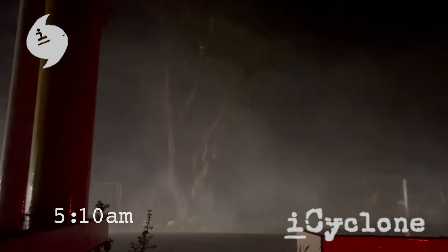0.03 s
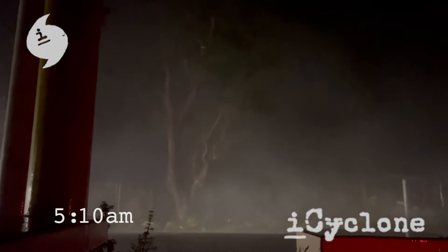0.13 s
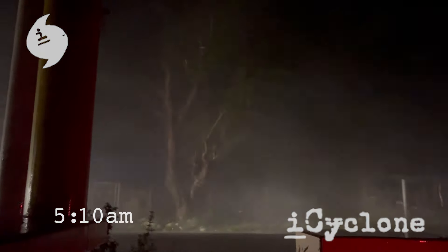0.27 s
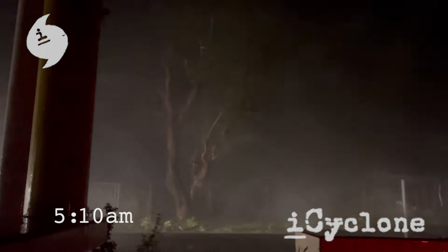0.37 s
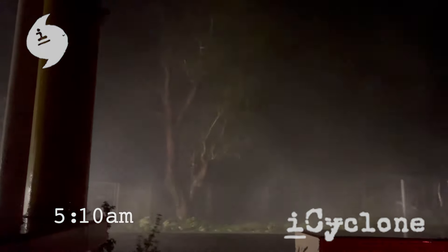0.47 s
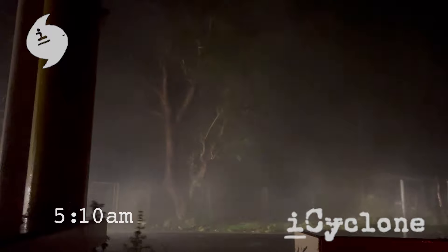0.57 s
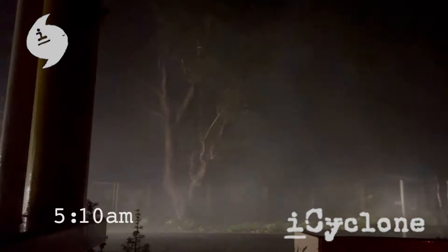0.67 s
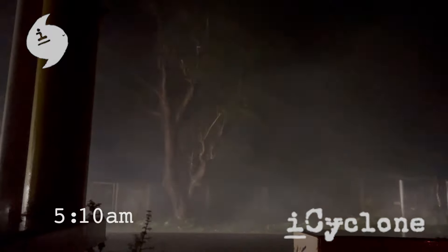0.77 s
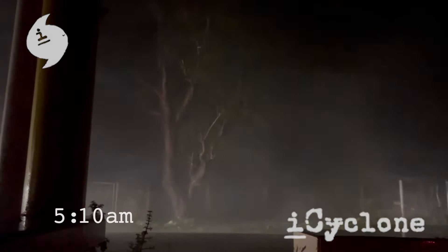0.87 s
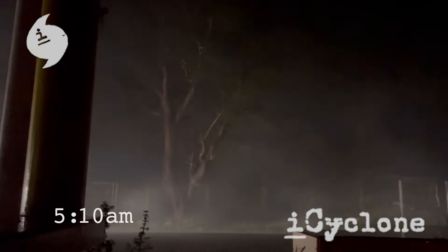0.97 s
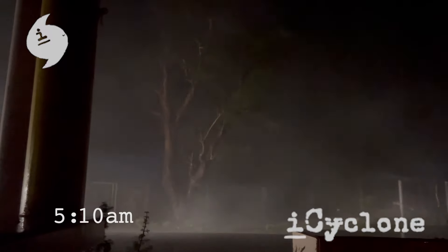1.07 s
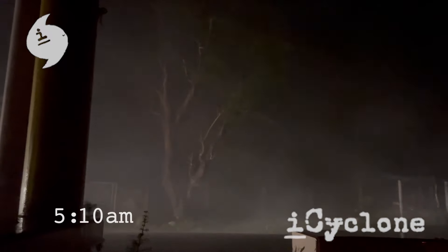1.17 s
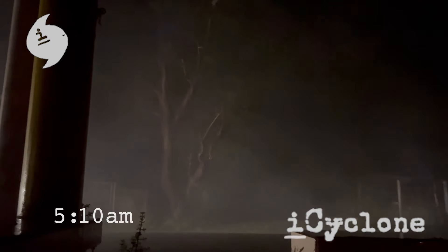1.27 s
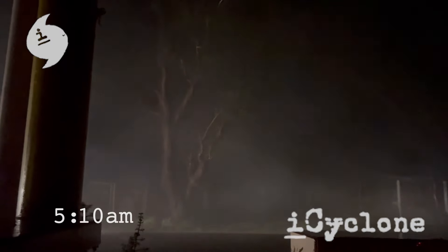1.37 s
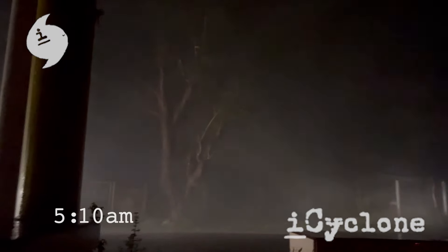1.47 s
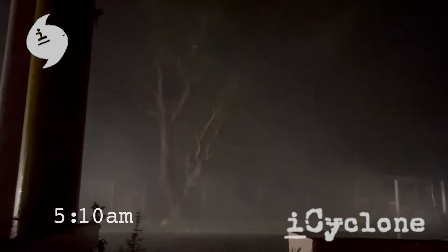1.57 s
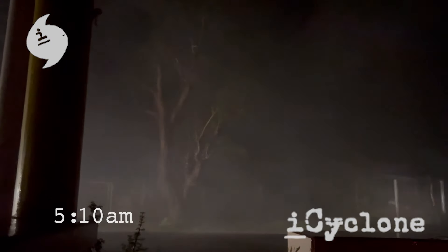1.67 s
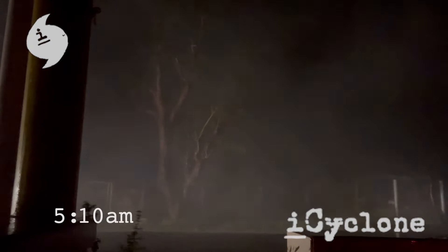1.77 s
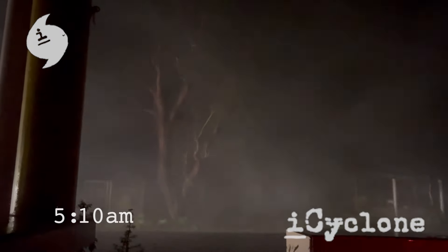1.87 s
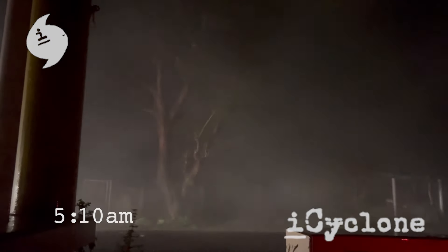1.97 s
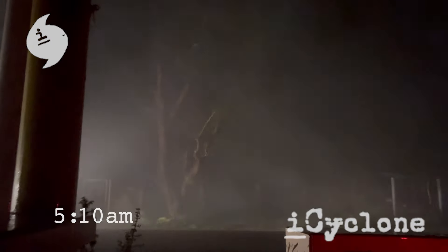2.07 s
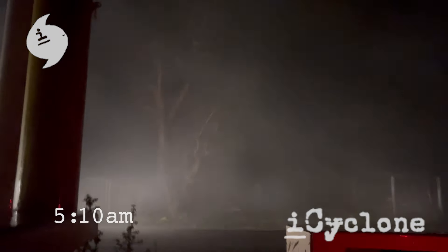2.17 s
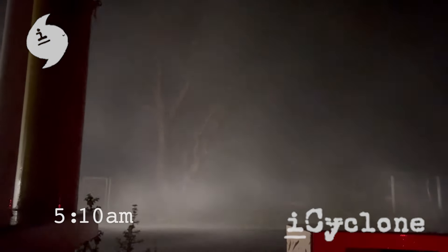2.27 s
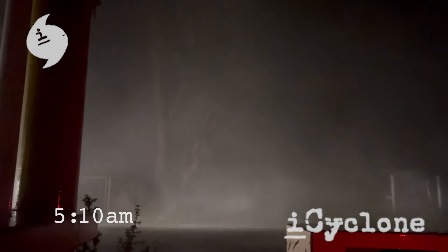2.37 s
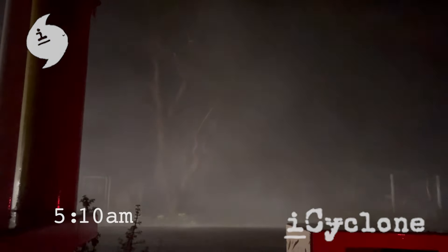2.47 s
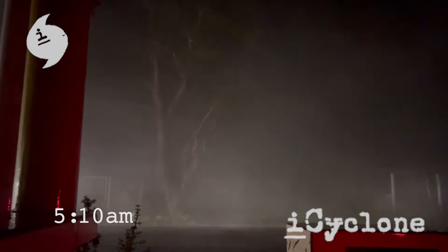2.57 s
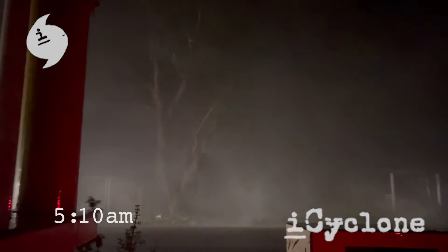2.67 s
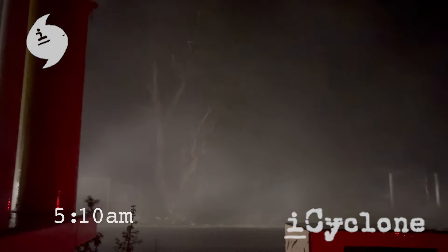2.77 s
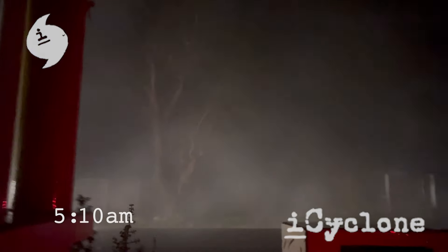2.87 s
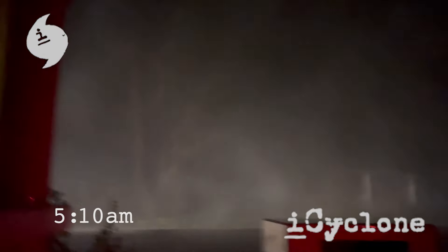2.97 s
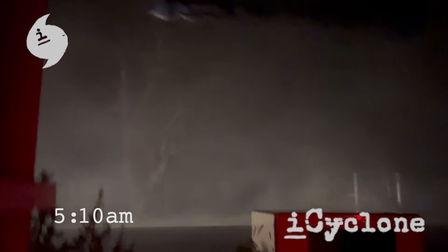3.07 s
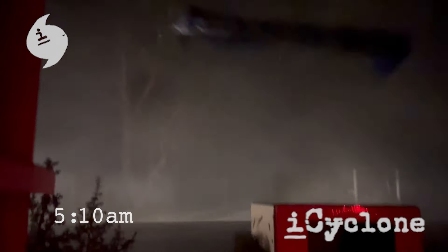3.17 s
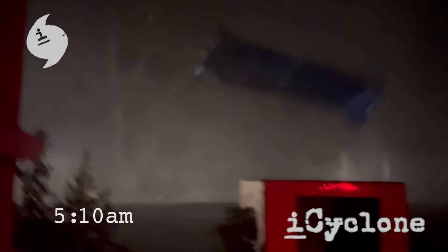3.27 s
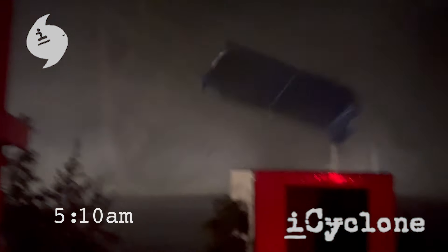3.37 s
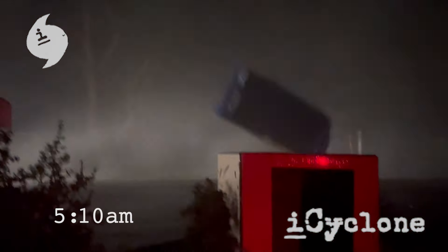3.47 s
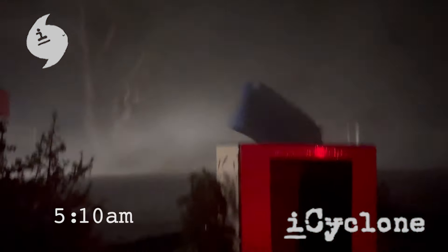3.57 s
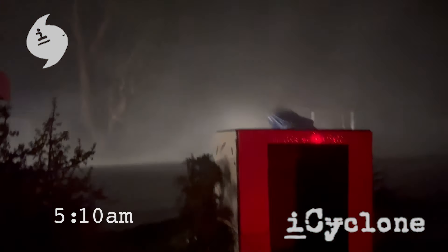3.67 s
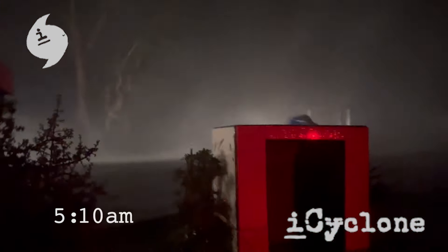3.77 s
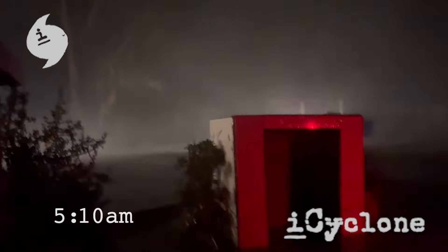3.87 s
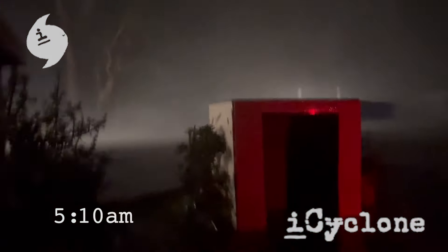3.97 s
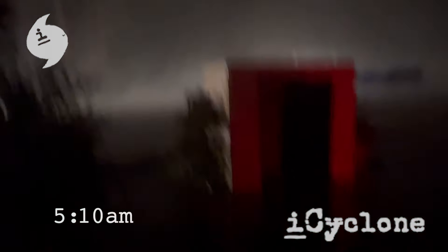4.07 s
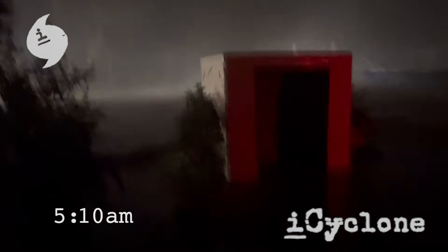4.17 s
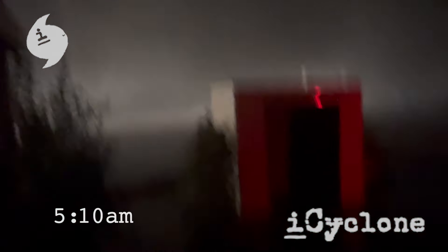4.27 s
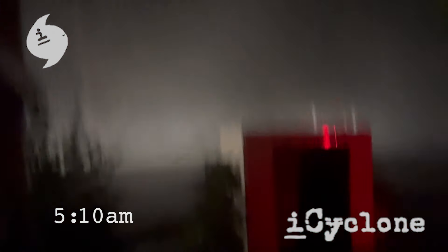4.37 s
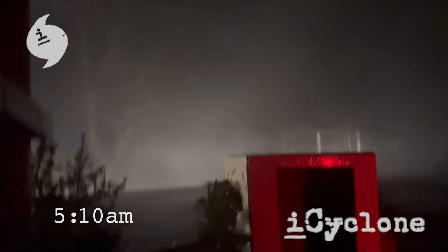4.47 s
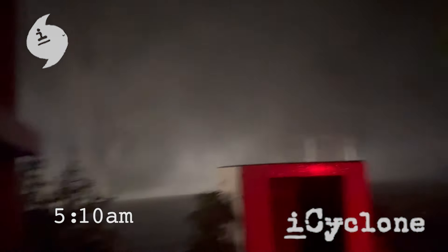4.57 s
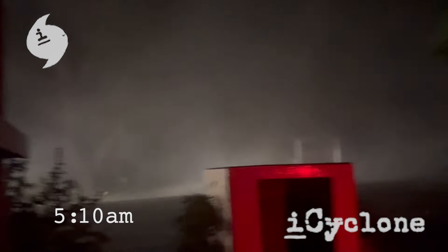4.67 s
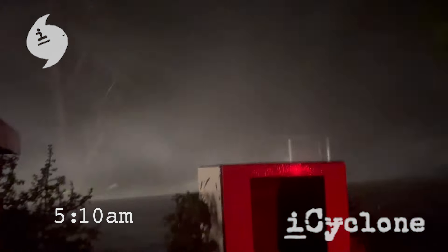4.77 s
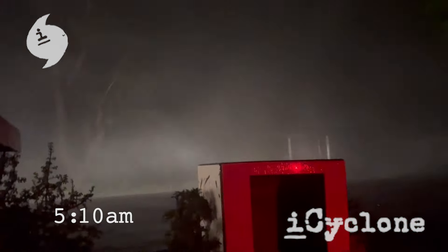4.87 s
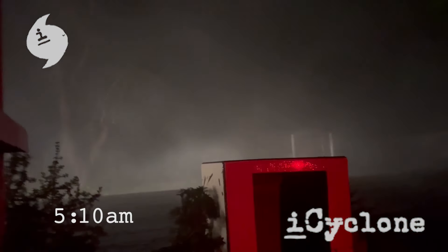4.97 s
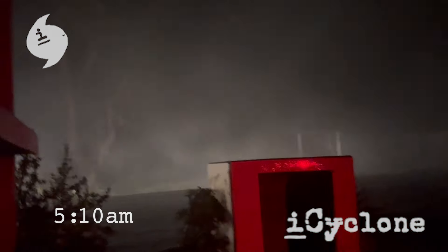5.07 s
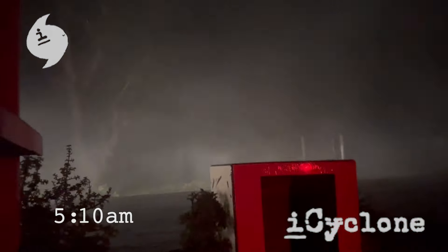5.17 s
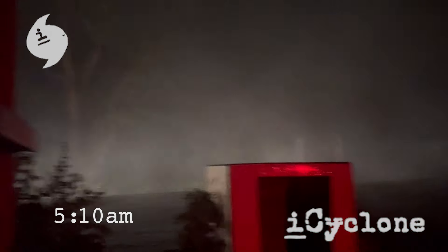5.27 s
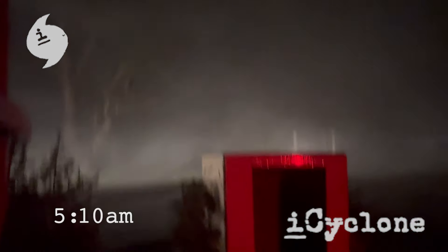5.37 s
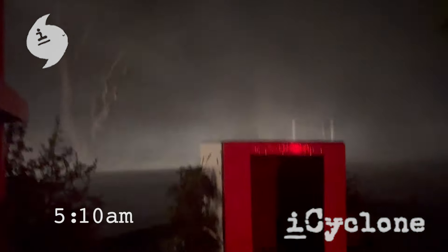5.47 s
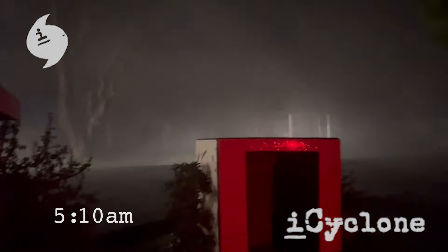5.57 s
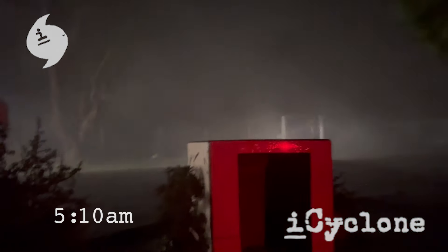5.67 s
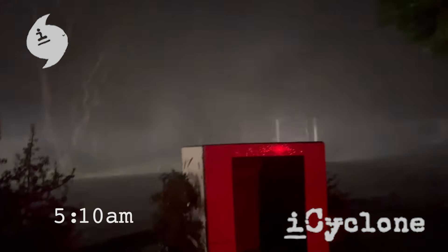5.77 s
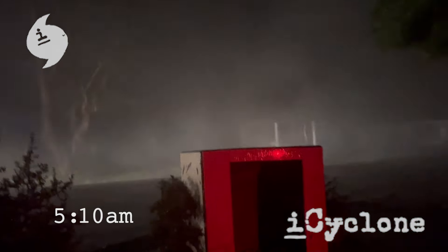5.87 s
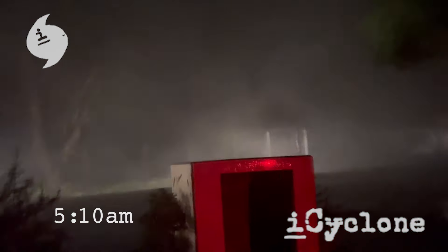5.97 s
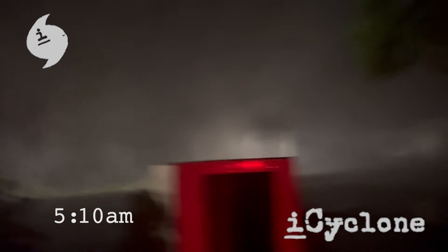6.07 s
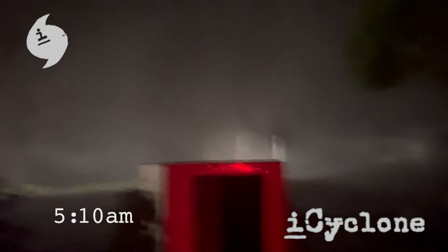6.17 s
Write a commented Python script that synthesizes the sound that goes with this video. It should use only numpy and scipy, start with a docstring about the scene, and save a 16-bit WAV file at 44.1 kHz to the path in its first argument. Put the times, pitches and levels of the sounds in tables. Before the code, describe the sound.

Fierce night storm heard from a porch: gusting wind, spray, heaving metal thumps near two seconds, a sharp crack and panel crash later.

```python
"""Hurricane wind roars round a building and rushes through trees: turbulent noise with fluctuating bands.
Low swells and noise drive the damped air modes of a porch; spray and drops add a hissing, pattering rain.
Loose sheet metal heaves and a flying panel crashes and bounces: dense contacts that excite plate modes.
Grit strikes ring wall boards briefly, and wind at edges sings as short wavering tones.
A phone sheltering in the porch hears it all through two microphone ports."""
import sys
import numpy as np
from scipy import signal
from scipy.fft import rfft, irfft
from scipy.io import wavfile
from scipy.ndimage import uniform_filter1d

SR = 44100
rng = np.random.default_rng(int(sys.argv[2]) if len(sys.argv) > 2 else 0)


def unload_wav(signal):
    """Save mono or channel-first audio to the path in sys.argv[1] as 16-bit WAV at rate SR, clipped to [-1, 1]."""
    wavfile.write(
        sys.argv[1],
        SR,
        np.round(np.clip(np.atleast_2d(signal).T, -1, 1) * 32767).astype(np.int16),
    )


N = 275184
# time in s, and the frequency in Hz of each Fourier bin
T, F = np.arange(N) / SR, np.arange(N // 2 + 1) * SR / N


def undb(db):
    """Amplitude ratio: 20 dB is a factor of ten."""
    return np.exp(np.asarray(db) * (np.log(10) / 20))


def unit(x):
    """Power normalisation: scale to an rms of 1."""
    return x / np.sqrt(np.mean(x ** 2))


def curves(table):
    """Linear interpolation of each control column at every sample."""
    times, *columns = np.transpose(table)
    return [np.interp(T, times, column) for column in columns]


def response(points):
    """Magnitude response: decibels interpolated over log frequency."""
    hz, db = np.transpose(points)
    return undb(np.interp(np.log(F + 1), np.log(hz), db))


def shape(x, gain):
    """Linear filtering: multiply the spectrum by a gain for every frequency."""
    return irfft(rfft(x) * gain, N)


def resonance(hz, width):
    """Damped oscillator: the response of one mode, 1 at its centre."""
    return 1j * F * width / (hz ** 2 - F ** 2 + 1j * F * width)


def noise():
    """Diffuse field: unrelated white noises for mid and side."""
    return rng.standard_normal((2, N))


def walk(rate):
    """Slow random fluctuation: levels held for 1 / rate s and smoothed twice, rms 1."""
    hold = max(int(SR / rate), 2)
    held = np.repeat(rng.standard_normal(N // hold + 2), hold)
    smooth = uniform_filter1d(uniform_filter1d(held, hold), hold)
    return unit(smooth[hold // 2:hold // 2 + N])


def impacts(per_s, spread_db):
    """Poisson-like shot noise: random small impacts, many weak and few strong."""
    size_db = spread_db * np.minimum(rng.exponential(size=(2, N)), 5)
    hits = rng.random((2, N)) < per_s / SR
    return unit(hits * np.sign(noise()) * undb(size_db))


def fade(age, t60):
    """Exponential damping: a decay of 60 dB in t60 seconds."""
    return np.exp(-np.log(1000) * age / t60)


def swell(s, length):
    """Gaussian envelope: a smooth rise and fall round the time s."""
    return np.exp(-((T - s) / length) ** 2)


def eddies(x, colour, swirl_db, flicker_db, rate, count=5):
    """Turbulent modulation: all bands surge together, and each one also flutters alone."""
    spectrum, total = rfft(x) * response(colour), 0
    edges = np.log([colour[0][0], colour[-1][0]])
    place = np.interp(np.log(F + 1), edges, [0, count - 1])
    for k in range(count):
        # overlapping triangular bands that add up to the whole spectrum
        band = irfft(spectrum * np.maximum(1 - abs(place - k), 0), N)
        total = total + band * undb(flicker_db * walk(rate))
    return unit(total * undb(swirl_db * walk(rate / 2)))


def weather():
    """Superposed level control in dB: the storm's slow course plus brief lifts."""
    # slow course before the offsets below: start_s, wind_level_db, rain_level_db
    storm = [(0.0, -22.5, -31.5), (0.5, -26, -32.5), (0.83, -26.5, -34), (1.23, -23.5, -31.5),
             (1.46, -25, -34.5), (1.72, -27.5, -33.5), (1.86, -22.5, -33.5), (1.94, -22, -33.5),
             (2.15, -25.5, -33.5), (2.59, -28.5, -36), (2.9, -26, -36), (3.37, -30, -37.5),
             (3.75, -27.5, -35), (3.89, -30.5, -39), (4.8, -28.5, -38), (5.32, -29.5, -37),
             (5.84, -30, -38), (6.24, -27.5, -34)]
    # short gusts through the trees (a negative lift is a lull), and one brief knock at 4.357 s:
    # centre_s, lift_db, half_length_s
    lifts = [(0.042, 8.5, 0.04), (0.80, 3.5, 0.07), (1.056, 2, 0.06), (1.97, 0.5, 0.043),
             (2.41, 3.5, 0.076), (2.86, -1, .06), (4.22, 2.4, 0.11), (4.357, 8, .025), (5.23, 1.5, .08)]
    wind_db, rain_db = curves(storm)
    lift_db = sum(db * swell(s, length) for s, db, length in lifts)
    # the rush takes the whole lift, the roar and the rain a share of it
    roar_db = wind_db - 1.5 + 0.25 * lift_db
    rush_db = wind_db - 3.46 + lift_db
    return roar_db, rush_db, rain_db + 0.84 + 0.34 * lift_db


def wind(roar_db, rush_db):
    """Turbulent flow noise: a low roar round the walls and a brighter rush through the trees."""
    # relative spectrum of the roar: frequency_hz, level_db
    roar_colour = [(40, -9), (90, -4), (140, -4.5), (175, -8.5), (215, -4.5), (280, 1.5), (430, -2.5),
                   (600, -9), (1000, -19), (2500, -36.5)]
    # relative spectrum of the rush: frequency_hz, level_db
    rush_colour = [(250, -18), (550, -1), (800, -0.5), (1100, 0.5), (1550, -1), (2000, -4), (2500, -10.5),
                   (3500, -22), (8000, -40)]
    roar = eddies(noise(), roar_colour, swirl_db=1.5, flicker_db=1.5, rate=24, count=6)
    rush = eddies(noise(), rush_colour, swirl_db=0.3, flicker_db=1.84, rate=28, count=9)
    return roar * undb(roar_db) + rush * undb(rush_db)


def porch(roar_db):
    """Cavity resonance: low swells lift the lowest air mode; the higher modes follow the roar's level."""
    # air modes, lowest first: frequency_hz, width_hz, relative_level_db
    air_modes = [(65.5, 16.4, 0), (184, 20, -3), (330, 99, -9.5)]
    # low swells in the porch: slapping eddies, and the crash's boom at 3.62 s:
    # centre_s, level_db, half_length_s
    low_swells = [(0.04, -21.5, .04), (0.26, -23, .025), (0.355, -23, .025), (0.96, -23.5, .03),
                  (1.762, -17.5, .042), (1.975, -21, .028), (2.096, -19, .032), (2.27, -26, .03),
                  (2.64, -22, .033), (3.62, -23.5, .04), (4.338, -23.5, 0.061), (4.85, -22.5, 0.024),
                  (5.023, -23.5, .03), (6.106, -25, .04)]
    boom_db, boom_growth = -30.5, 0.27  # steady boom, and its dB per dB of wind
    hollow_db, hollow_growth = -34, 1.0  # higher modes, and their dB per dB of wind
    lowest, *higher = (undb(db) * resonance(hz, width) for hz, width, db in air_modes)
    boom = unit(shape(noise(), lowest * resonance(87, 110) / (1 + (F / 115) ** 8)))
    # the air swings with a fairly even strength between swells
    boom = boom / np.sqrt(uniform_filter1d(boom ** 2, int(.08 * SR), axis=1))
    hollow = unit(shape(noise(), sum(higher) * resonance(209, 224)))
    surge_db = roar_db - np.mean(roar_db)
    steady = undb(boom_db + boom_growth * surge_db)
    swell_power = sum((undb(db) * swell(s, length)) ** 2 for s, db, length in low_swells)
    drive = np.sqrt(steady ** 2 + swell_power)
    return boom * drive + hollow * undb(hollow_db + hollow_growth * surge_db)


def rain(rain_db):
    """Shot noise: far spray merges into a smooth hiss; nearer drops patter through it."""
    # relative spectrum of the rain: frequency_hz, level_db
    rain_colour = [(700, -3.5), (2000, -2), (3000, 1), (4400, 0.5), (6200, 1.5), (7600, 0), (9000, -3),
                   (10800, -4.5), (12200, -11.5), (15500, -17)]
    drops = noise() + undb(-10.5) * impacts(per_s=2500, spread_db=4.0)
    return eddies(drops, rain_colour, swirl_db=0.03, flicker_db=0.7, rate=18) * undb(rain_db)


def debris():
    """Impact excitation: a heaving roof sheet and a flying panel, with a diffuse echo from the walls."""
    # roof sheet heaving in the gusts: start_s, level_db, t60_s, hardness_db, ring_db
    heaves = [(0.0, -14, 0.2, -0.5, -23), (1.665, -16.5, 0.85, 3.5, -14), (1.70, -15.5, 0.86, -6, -1),
              (1.86, -25.5, 0.56, 1, 8), (1.938, -13.5, .3, -0.5, -20), (1.995, -17.5, 0.7, -11, -7),
              (2.585, -27, .24, -17, -14)]
    # modes of the roof sheet: frequency_hz, relative_level_db, t60_s
    sheet_modes = [(97, -6, .3), (121.1, 0.5, 0.98), (181.6, 1, 0.47), (266, -17, 0.38), (357, -21, 0.24),
                   (440, -19, 0.2), (580, -27, 0.16), (823, -11, 0.37), (1044, -13, 0.25)]
    # panel landing and bouncing: start_s, level_db, t60_s, hardness_db, ring_db
    crashes = [(3.566, -14.5, 0.23, -0.5, 2.5), (3.595, -19, 0.26, -1.5, -3), (3.708, -23.5, 0.47, 0.5, 2)]
    # modes of the panel: frequency_hz, relative_level_db, t60_s
    panel_modes = [(94, -4, 0.35), (230, -4, 0.36), (307.5, -2.5, 0.21), (434, -10.5, 0.16),
                   (547, -5, 0.06), (844, -20, 0.1), (1540, -22, .2)]
    # rise in s; treble and bass in dB at a hardness of 0
    direct = (clatter(heaves, sheet_modes, rise=0.015, treble_db=-4, bass_db=-1.5)
              + clatter(crashes, panel_modes, rise=0.012, treble_db=5.5, bass_db=2.5))
    return direct + undb(-11) * walls(direct, t60=0.57)


def clatter(blows, modes, rise, treble_db, bass_db):
    """Modal excitation: each blow is a dense run of contacts that feeds energy to a thin sheet's modes."""
    # relative spectrum of the contacts: frequency_hz, level_db
    contact_colour = [(35, -20), (75, -5.5), (130, -4), (250, 4), (450, -1.5), (620, -3.5), (850, -1.5),
                      (1600, -8), (2600, -15), (4000, -18), (5600, -16.5), (8000, -21.5), (12500, -33.5),
                      (16000, -40)]
    bass_trade = 0.7  # dB of bass lost per dB of hardness
    treble = 1 / (1 + (2200 / (F + 1)) ** 2)
    bass = 1 / (1 + (F / 330) ** 2)
    power, energy, age = np.zeros((3, N)), np.zeros((len(modes), N)), T[:SR]
    attack, after = np.minimum(age / rise, 1), np.maximum(age - rise, 0)
    for s, db, t60, hard_db, ring_db in blows:
        start = max(int(s * SR), 0)
        span = slice(start, start + SR)
        # a harder blow has more treble and less bass
        colour_db = np.array([[bass_db - bass_trade * hard_db], [0], [treble_db + hard_db]])
        power[:, span] += (undb(db + colour_db) * attack * fade(after, t60)) ** 2
        for k, (_, mode_db, mode_t60) in enumerate(modes):
            energy[k, span] += (undb(db + ring_db + mode_db) * attack * fade(after, mode_t60)) ** 2
    ring = 0
    for mode_energy, (hz, _, _) in zip(energy, modes):
        # the sheet bends as it moves, so the pitch of each mode wanders
        bent_time = np.cumsum(1 + 0.0346 * walk(40)) / SR
        ring = ring + np.sqrt(mode_energy) * np.sin(2 * np.pi * hz * bent_time)
    contacts = impacts(per_s=1400, spread_db=2.0) + undb(2.5) * noise()
    contacts = unit(shape(contacts, response(contact_colour)))
    bands = (bass, 1 - bass - treble, treble)
    rattle = sum(np.sqrt(p) * shape(contacts, band) for p, band in zip(power, bands))
    return rattle + ring * np.array([[1], [.5]])  # mid, side


def walls(x, t60):
    """Diffuse reverberation: convolve with decaying noise for the porch and the house fronts."""
    tail = noise()[:, :SR] * fade(T[:SR], t60)
    tail = tail / np.sqrt(np.sum(tail[0] ** 2))
    return signal.fftconvolve(x, tail, axes=1)[:, :N]


def grit():
    """Impulse response: grit and twigs crack on wall boards, whose modes ring for milliseconds."""
    # strikes, relative before the output gain: start_s, level_db, scatter_s (near 0 = one lone strike)
    ticks = [(0.757, -17, 0.0077), (3.31, 4.5, 0.00033), (4.338, -9, 0.03)]
    # modes of the wall boards: frequency_hz, relative_level_db, t60_s
    board_modes = [(1370, -7.5, 0.017), (2120, 0.5, 0.0073), (2550, -5, 0.0049), (3420, -5.5, 0.0046),
                   (6200, -11, 0.0022), (8800, -15, 0.0049), (12660, -13, 0.0018)]
    strikes, age = np.zeros(N), T[:SR // 10]
    for s, db, scatter in ticks:
        count = 1 + int(400 * abs(scatter))
        times = s + scatter * rng.random(count)
        strikes[(times * SR).astype(int)] = undb(db)
    ring = 0
    for hz, db, t60 in board_modes:
        tone = np.sin(2 * np.pi * (hz * age + rng.random()))
        ring = ring + undb(db) * fade(age, t60) * tone
    snap = undb(-2.5) * fade(age, .005) * rng.standard_normal(len(age))
    # light grit makes little bass, and its echo is duller than the strike
    crack = shape(signal.oaconvolve(strikes, ring + snap)[:N], 1 / (1 + (850 / (F + 1)) ** 4))
    echo = undb(-4) * shape(walls(crack[None], t60=.14), 1 / (1 + (F / 10000) ** 4))
    return undb(-14.5) * (crack * np.array([[1], [.4]]) + echo)


def whistle():
    """Vortex shedding: wind at an edge or opening sings briefly, wavering in pitch and strength."""
    # hoots and whistles, relative before the output gains: centre_s, pitch_hz, half_length_s, level_db
    whistles = [(0.036, 763, 0.028, -23), (1.132, 452, 0.021, -25), (1.438, 2570, 0.019, -31),
                (1.495, 2600, .02, -47), (2.45, 814, 0.05, -30), (2.604, 301.4, 0.014, -19.5),
                (2.85, 986, 0.039, -31)]
    tones, waver = np.zeros(N), np.cumsum(0.0229 * walk(300)) / SR
    for s, hz, length, db in whistles:
        near = abs(T - s) < length * np.pi
        tone = np.sin(2 * np.pi * hz * (T[near] + waver[near]))
        tones[near] += undb(db) * swell(s, length)[near] * tone
    return tones * undb(3.1 * walk(90)) * np.array([[1.2], [.4]])  # mid, side


def scene():
    """Spatial coherence: sum all sources as mid and side; long waves reach both ports alike."""
    # gain of the side against the mid: frequency_hz, level_db
    width = [(60, -37), (110, -11.5), (200, -14), (380, -6), (700, -2.5), (1600, 0), (2200, -1.5),
             (3200, -0.5), (6000, -1.5)]
    roar_db, rush_db, rain_db = weather()
    mid, side = (wind(roar_db, rush_db) + porch(roar_db) + rain(rain_db)
                 + debris() + grit() + whistle())
    side = shape(side, response(width))
    return np.array([mid + side, mid - side])


def record(dry):
    """Two-port pickup: unequal treble, a shared top band late and inverted on the left, soft limiting."""
    # left port against the right: frequency_hz, level_db
    balance = [(1300, -0.15), (2400, -1), (3300, 4.5), (4600, 5), (6600, 10), (8000, 1.5), (9000, 0.5)]
    shared_hz, port_lag, top_hz = 8000, 13, 15800  # Hz, samples, Hz
    left, right = rfft(dry)
    shared = 1 / (1 + (shared_hz / (F + 1)) ** 20)
    late = -right * np.exp(-2j * np.pi * F * port_lag / SR)
    left = np.sqrt(1 - shared) * left + np.sqrt(shared) * late
    tilt = response(balance)
    # the tilt keeps the total power gain of the two ports
    out = irfft(np.array([left * tilt, right]) * np.sqrt(2 / (1 + tilt ** 2)), N)
    out = out / (1 + (out / .85) ** 4) ** .25  # the loudest peaks are rounded
    lowpass = signal.ellip(8, .2, 70, top_hz, fs=SR, output="sos")
    return signal.sosfilt(lowpass, out)


dry = scene()
out = record(dry)
unload_wav(out)
```